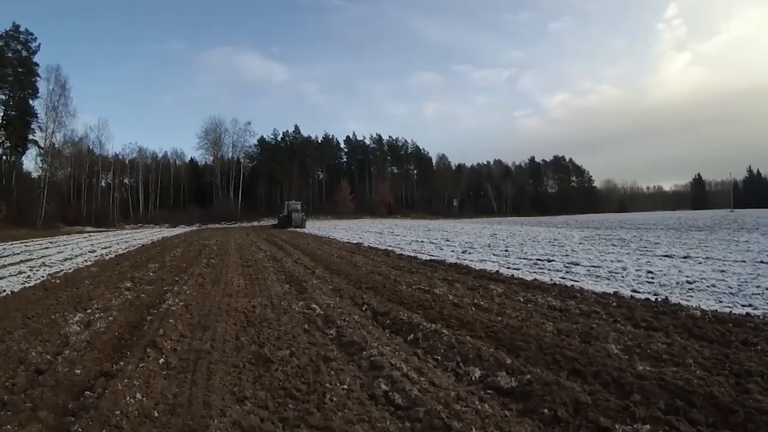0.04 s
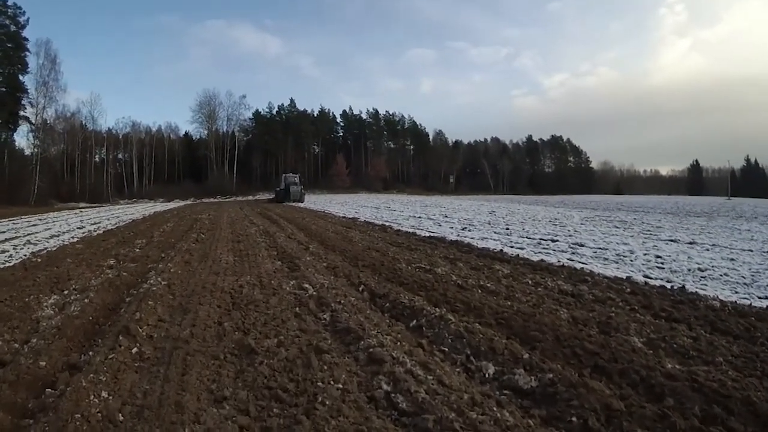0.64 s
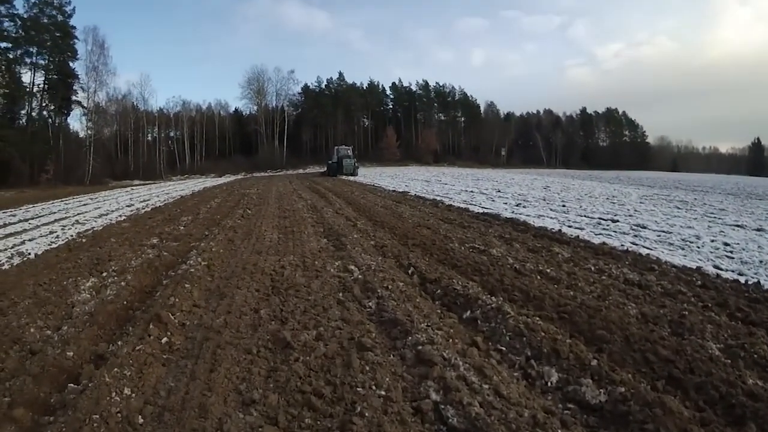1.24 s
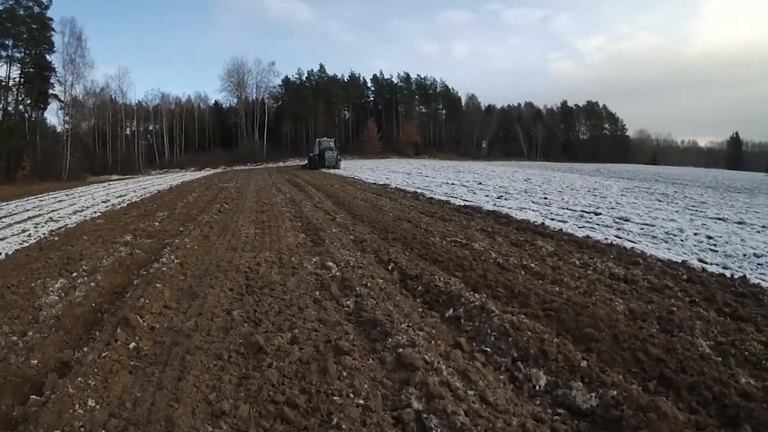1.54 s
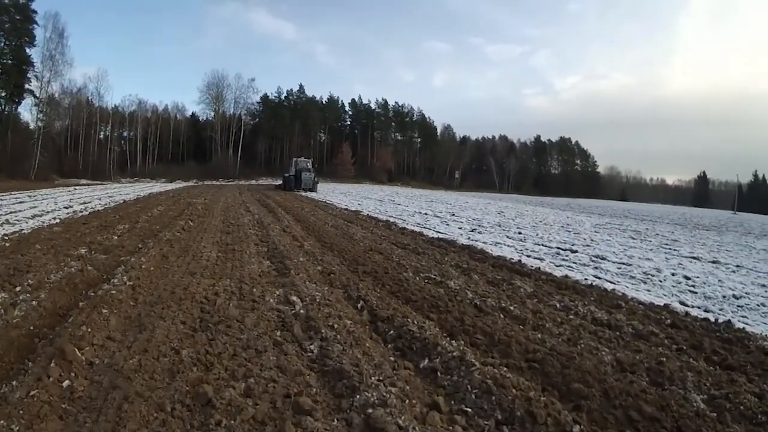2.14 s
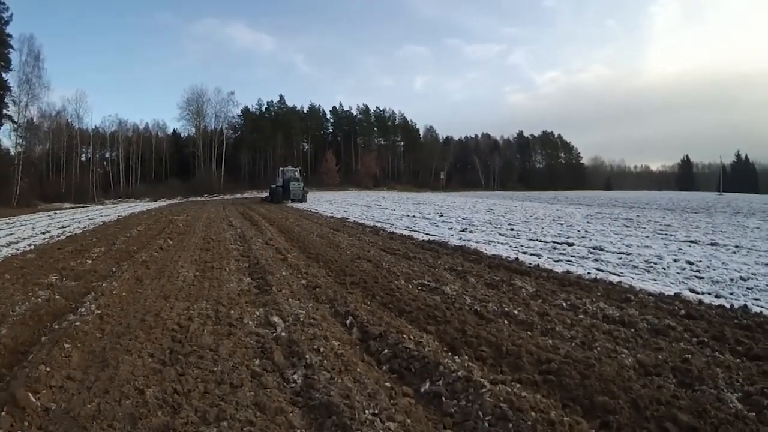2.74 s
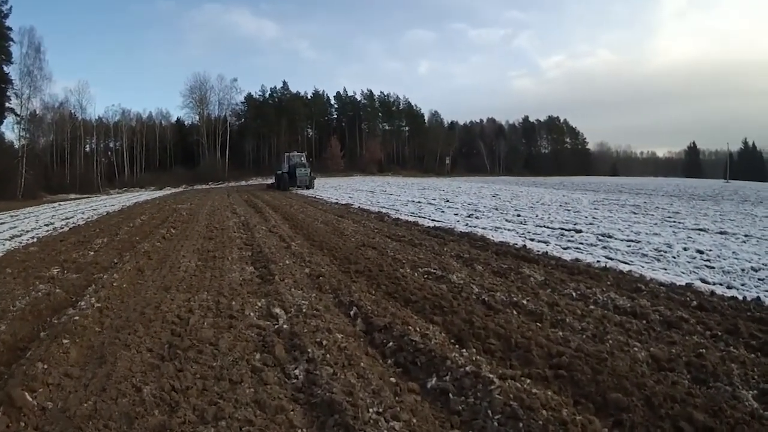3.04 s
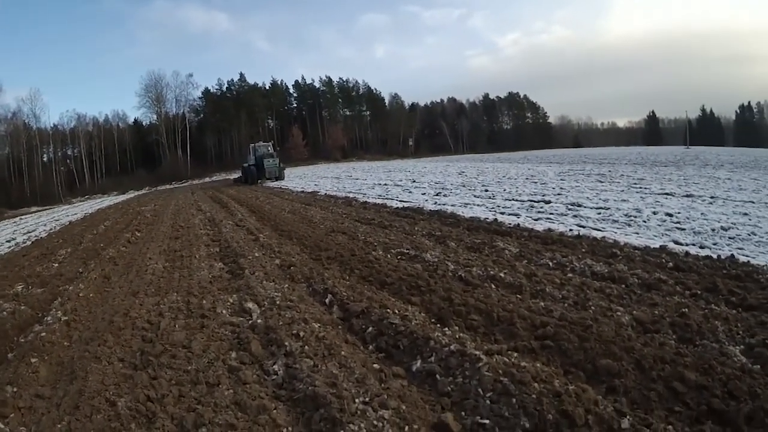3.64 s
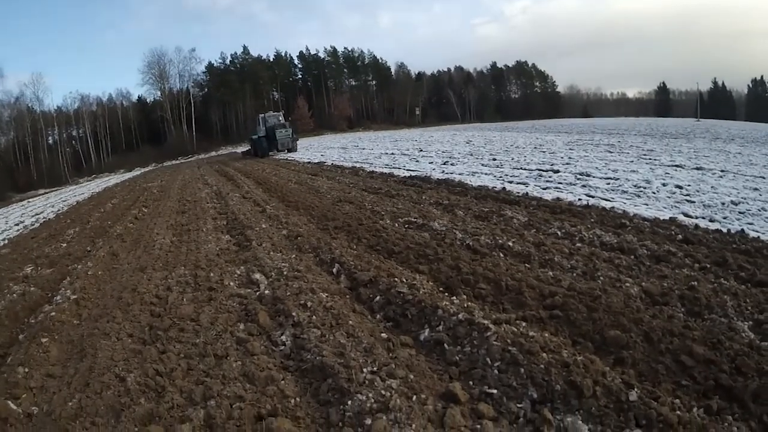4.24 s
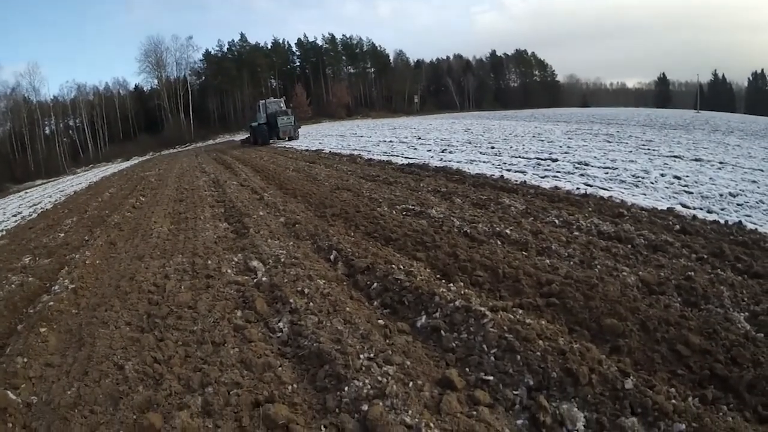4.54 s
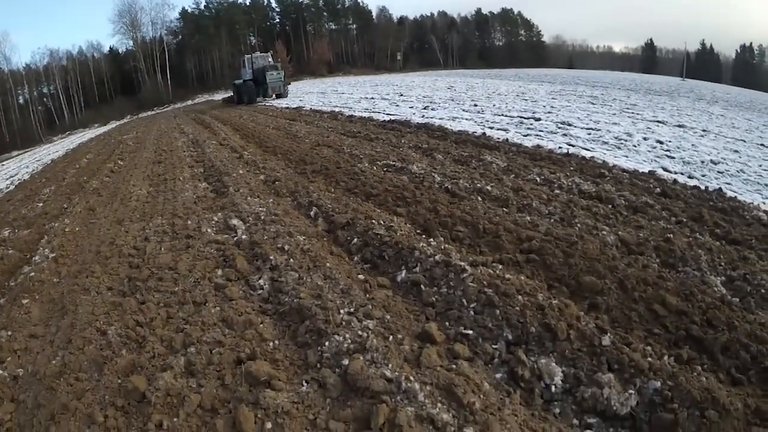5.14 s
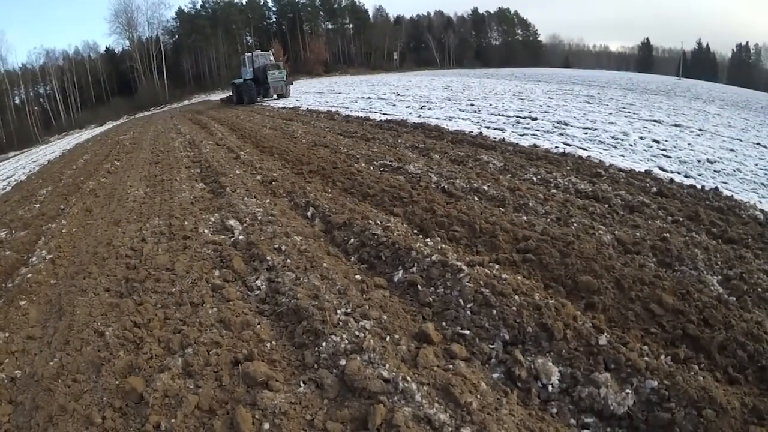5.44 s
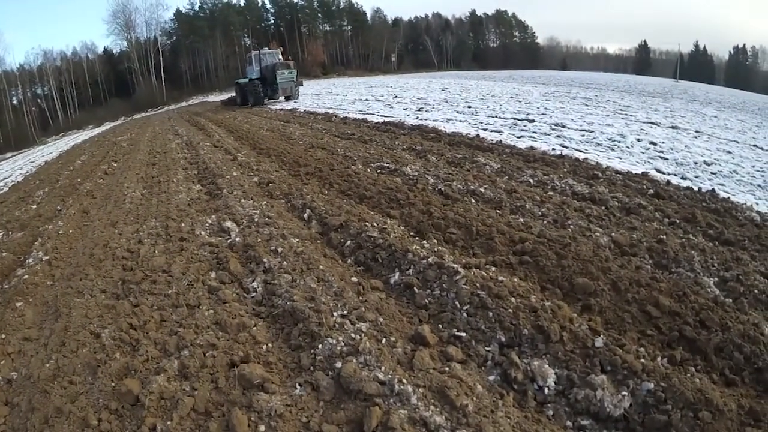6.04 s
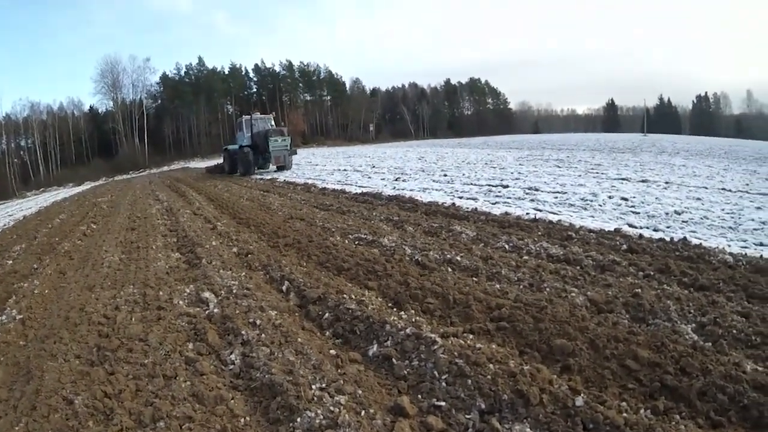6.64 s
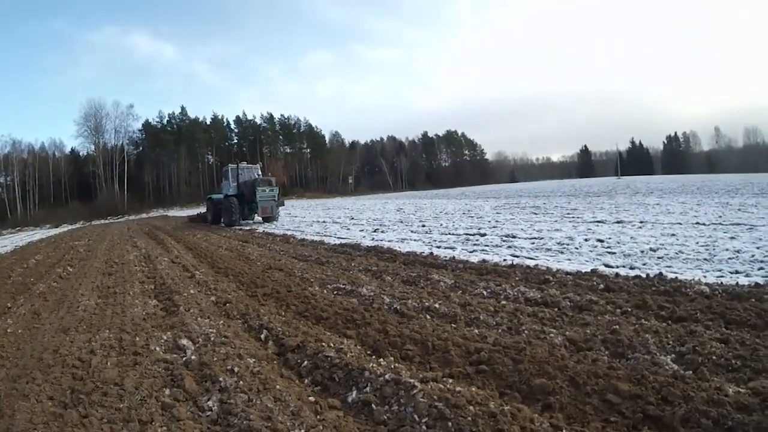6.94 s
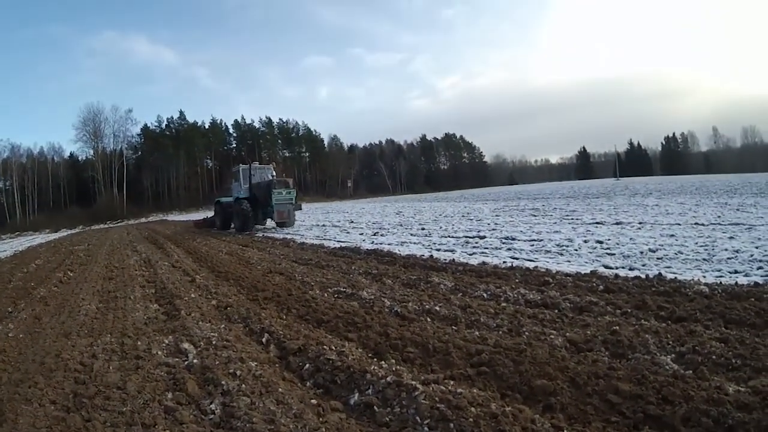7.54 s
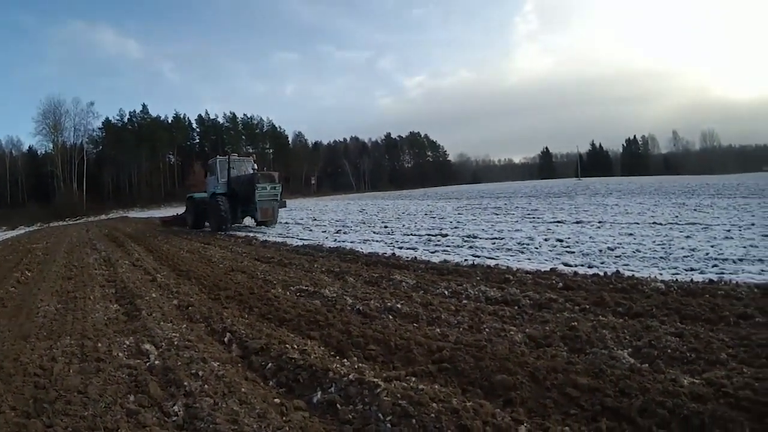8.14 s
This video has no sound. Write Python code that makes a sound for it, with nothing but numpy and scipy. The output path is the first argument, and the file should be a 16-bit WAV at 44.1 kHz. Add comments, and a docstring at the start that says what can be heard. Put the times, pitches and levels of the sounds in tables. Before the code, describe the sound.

A diesel tractor drones steadily closer across a field, its engine knocking, whining and rattling, with one short air hiss near the end.

```python
"""A low diesel boom comes slowly closer: a six-cylinder tractor drags an implement over a half-frozen field.
Unevenly spaced firings pulse from the exhaust, combustion knocks in the block, gears whine, valve gear
ticks and gas hisses. Short reflections interfere with the engine sound and sweep its colour.
Rubbing steel squeals faintly, wind brushes the microphone, and near the end an air valve spits once."""
import sys
import numpy as np
from scipy import signal
from scipy.fft import rfft, irfft, next_fast_len
from scipy.io import wavfile
from scipy.ndimage import uniform_filter1d, map_coordinates

SR = 44100
rng = np.random.default_rng(int(sys.argv[2]) if len(sys.argv) > 2 else 0)


def generate_wav(sig):
    """Save sig (samples, or channels by samples) to the path in sys.argv[1] as 16-bit PCM at SR."""
    pcm = np.round(np.clip(np.atleast_2d(sig).T, -1, 1) * 32767).astype(np.int16)
    wavfile.write(sys.argv[1], SR, pcm)


N = 369999
TIME = np.arange(N) / SR

# engine speed, hunting under the governor: time_s, firing_hz
FIRING_RATE = [(0.0, 79.67), (1.05, 79.17), (1.35, 79.9), (1.8, 78.9), (2.1, 79.69), (2.7, 79.03),
               (3.15, 80.17), (3.45, 79.29), (3.75, 81.13), (3.9, 79.27), (5.55, 79.44), (5.85, 79.92),
               (6.0, 79.27), (6.6, 79.86), (6.75, 79.8), (8.4, 79.27)]
# cylinder strengths in firing order: level_db
CYLINDER_DB = [-1.5, 4, -2, -1.4, -2.3, 0.8]
# exhaust harmonics of the engine cycle (6 is the firing tone): harmonic, level_db
EXHAUST_LINES = [(3, -22), (4, -24), (5, -26.5), (6, 0.5), (7, -29), (8, -26), (9, -14.5), (12, -25),
                 (15, -21), (18, -25.5)]
# gear and fan tones, relative to the knock: harmonic (rounded in use), nose_db, flank_db
WHINE_LINES = [(32, -32, -19.5), (60, -10.5, -8), (63.3, -38, -8.5), (66, -22, -1), (69.6, -13, -11),
               (78.5, -24, -8.5), (94.4, -18, -20), (117, -21, -27), (126, -32, -20)]
# spectral envelopes of the noises: frequency_hz, level_db
GROWL_SPECTRUM = [(90, 2), (150, -1), (235, 0.5), (290, -3), (360, 1), (440, 2.5), (560, -3), (900, -49)]
KNOCK_SPECTRUM = [(200, -21), (290, -8.5), (370, -4), (480, -4.5), (640, -3), (800, 0), (980, 1),
                  (1200, -11), (1500, -8), (2500, -41), (5000, -47)]
RATTLE_SPECTRUM = [(700, -54), (1200, 4.5), (1550, -0.5), (1800, 1), (2100, 0), (2500, -5), (3000, -6),
                   (3500, -6.5), (4400, -18.5), (5500, -15), (9000, -29.5)]
HISS_SPECTRUM = [(1500, 1.5), (3000, -5.5), (4600, 1.5), (6000, -0.5), (7500, 0.5), (9200, 1), (10500, -2),
                 (12000, -6), (13500, -9), (15300, -28)]
WIND_SPECTRUM = [(8, 11), (18, 24), (35, 4.5), (60, -8), (100, -3), (200, -21.5), (500, -73)]
VALVE_SPECTRUM = [(1200, -10), (2400, -8), (3500, -4.5), (5800, -5.5), (9000, -1.5), (11500, -2.5),
                  (13500, -5.5), (15300, -9)]
# resonances of small steel parts: pitch_hz, width_hz, level_db
STEEL_MODES = [(932, 93, 5), (1561, 25, 3.5), (2020, 31, -2), (2370, 40, -15), (2604, 105, -4.5),
               (2925, 22, 2), (3146, 11, 1), (3800, 60, -10), (4270, 210, -7), (4690, 26, -3)]
# slow swells on top of the approach: time_s, boom_db, treble_db
SWELLS = [(0.2, 0, -2.5), (0.9, -0.5, -0.7), (1.6, -0.8, -1.5), (2.8, 0.4, 1.65), (4.0, -0.3, 0.2),
          (4.8, 1.4, 1), (5.6, 0.3, 1.5), (6.8, 0.5, 0.8), (8.3, 0.3, 0.1)]
# side of the engine facing the listener: time_s, flank_share (0 nose, 1 flank)
ASPECT = [(0, 0.41), (2.9, 0.099), (5.1, 0.27), (5.8, .6), (6.55, 0.63), (7.1, 0.98), (8.39, 0.66)]
# squeals of rubbing steel: start_s, length_s, pitch_hz, level_db
SQUEAL_EVENTS = [(-.1, .9, 2400, -54.5), (-.1, .7, 2950, -50), (-.1, 1.8, 4770, -52),
                 (2.7, 0.52, 2930, -48), (4.25, 0.71, 2926, -51), (4.35, .4, 4700, -47),
                 (5.0, 0.59, 2640, -51.5)]
# echo off a nearby surface, later as the microphone tips down: time_s, delay_ms, gain
NEAR_REFLECTION = [(0.6, 1.697, .2), (1.4, 1.83, 0.28), (2.45, 1.88, 0.28), (3.35, 1.46, 0.21),
                   (4.3, 1.665, .24), (5.1, 1.8, 0.29), (6.45, 1.89, 0.24), (6.95, 1.33, .2),
                   (8.39, 1.39, .34)]
# wind on the microphone: time_s, level_db
WIND_LEVEL = [(0, -39), (2, -41), (5, -31), (8.39, -37)]

START_M, DRIVE_M_S = 49.6, 3.574  # a straight, steady approach
# layers that grow as the distance halves: start_db, per_halving_db
BOOM_DB, GROWL_DB = (-22, 7), (-46.5, 14.5)
KNOCK_DB, RATTLE_DB, HISS_DB = (-34, 7.5), (-39.5, 7), (-47.5, 11)
# directional parts, relative to the knock: nose_db, flank_db
PANEL_DB, BONNET_DB, HARD_CYLINDER_DB, HUM_DB = (-24, -3.5), (-4.5, -11.5), (-6.5, -15), (-21.5, -8)


def undb(db):
    """Amplitude ratio from decibels."""
    return 10 ** (np.asarray(db) / 20)


def unit(x):
    """Normalisation to rms 1."""
    return x / np.sqrt(np.mean(x ** 2))


def curves(table):
    """Linear interpolation of each column through time."""
    time_s, *columns = np.transpose(table)
    return [np.interp(TIME, time_s, column) for column in columns]


def noise():
    """Gaussian white noise."""
    return rng.standard_normal(N)


def walk(rate_hz):
    """Smooth random modulation with a spread near 1."""
    coarse = TIME[::100]
    steps = rng.standard_normal(2048)
    return np.interp(TIME, coarse, map_coordinates(steps, [coarse * rate_hz], order=2, mode="wrap"))


def shape(x, response):
    """Filtering as multiplication of the spectrum; the result has rms 1."""
    size = next_fast_len(N + 8192)
    hz = np.arange(size // 2 + 1) * SR / size + 1e-3
    return unit(irfft(rfft(x, size) * response(hz), size)[:N])


def colour(x, spectrum):
    """Filtering by a spectral envelope, interpolated in log frequency."""
    hz, db = np.transpose(spectrum)
    return shape(x, lambda f: undb(np.interp(np.log(f), np.log(hz), db)))


def mode(f, hz, width_hz):
    """Frequency response of a damped oscillator."""
    return 1 / (1 + 1j * (f * f - hz * hz) / (f * width_hz))


def resonate(x, hz, width_hz):
    """Two equal resonators in cascade give a peak with steep skirts."""
    return shape(x, lambda f: mode(f, hz, width_hz) ** 2)


def facing(nose_db, flank_db):
    """Directivity: a part's level in dB depends on the side turned to the listener."""
    flank_share, = curves(ASPECT)
    return nose_db + (flank_db - nose_db) * flank_share


def cycle_noise(cycle, repeat, size=3328):
    """Partly periodic noise: the share `repeat` of its power recurs every engine cycle."""
    pattern = signal.resample(rng.standard_normal(size), 4 * size)
    periodic = np.interp(cycle % 1, np.linspace(0, 1, len(pattern)), pattern)
    return np.sqrt(repeat) * periodic + np.sqrt(1 - repeat) * noise()


def firings(cycle, decay, base, lag=0.13):
    """Exponential decay to a base after each firing; decay and lag are in firing intervals."""
    count = len(CYLINDER_DB) * cycle
    count = count - lag * np.cos(np.pi * count / 2) ** 2 + 1  # every second cylinder fires late
    index = count.astype(int)
    scatter_db = 2.6 * np.clip(rng.standard_normal(1024), -1.8, 1.8)[index % 1024]
    strength = undb(np.take(CYLINDER_DB, index, mode="wrap") + scatter_db)
    return base + strength * np.exp(-(count % 1) / decay)


def exhaust_boom(cycle, boom_db, growl_db):
    """Periodic pulses form a harmonic series; uneven spacing adds half orders, unequal cylinders a lope."""
    lines = 0
    for harmonic, db in EXHAUST_LINES:
        # the firing tone is the steadiest; the upper lines grow with the growl
        waver_db = .25 if harmonic == len(CYLINDER_DB) else 1.2
        level_db = boom_db if harmonic < 2 * len(CYLINDER_DB) else (boom_db + growl_db) / 2 + 7
        phase = 2 * np.pi * harmonic * cycle + 0.0811 * harmonic ** 2  # dispersion in the silencer
        lines += undb(db + level_db + waver_db * walk(14)) * np.cos(phase)
    flutter = colour(noise(), [(15, -15), (40, 0), (66, 3), (100, -15), (135, -6), (170, -18), (300, -48)])
    return np.sqrt(2) * lines + undb(boom_db - 20) * flutter


def exhaust_growl(cycle):
    """Low flow noise in the stack, amplitude-modulated by the firings."""
    flow = cycle_noise(cycle, repeat=.35) * firings(cycle, decay=0.39, base=2.5)
    return colour(flow, GROWL_SPECTRUM)


def block_knock(cycle):
    """Forced vibration: combustion drives the block, the side panel and the bonnet."""
    force = firings(cycle, decay=0.43, base=4.2)
    casting = colour(force * cycle_noise(cycle, repeat=0.41), KNOCK_SPECTRUM)
    panel = resonate(force * cycle_noise(cycle, repeat=0.54), hz=888, width_hz=310)
    bonnet = resonate(force * cycle_noise(cycle, repeat=0.16), hz=1016, width_hz=435)
    knock = casting + undb(facing(*PANEL_DB)) * panel + undb(facing(*BONNET_DB)) * bonnet
    return knock * undb(0.99 * walk(9))


def hard_cylinder(cycle):
    """Impulse excitation: once a cycle, one harder-knocking cylinder rings the crankcase."""
    age_cycles = (cycle - 0.418) % 1
    envelope = np.exp(-age_cycles / 0.27) * (1 - np.exp(-age_cycles / 0.025))
    blows = envelope * cycle_noise(cycle, repeat=0.22)
    return undb(facing(*HARD_CYLINDER_DB)) * resonate(blows, hz=655, width_hz=170)


def gear_whine(cycle):
    """Gears and fan radiate directional harmonics of the engine cycle, which fade in and out in the air."""
    tones = 0
    for harmonic, nose_db, flank_db in WHINE_LINES:
        drift = .5 * walk(6) + rng.uniform(0, 2 * np.pi)
        level_db = facing(nose_db, flank_db) + 2.2 * walk(4)
        tones += undb(level_db) * np.sin(2 * np.pi * np.round(harmonic) * cycle + drift)
    return tones


def transmission_hum(cycle, harmonic=39, beat_hz=2.55):
    """Beating: two loaded gears hum at nearly the same frequency."""
    mesh_phase = 2 * np.pi * harmonic * cycle + 0.42 * walk(8)
    beat_phase = 2 * np.pi * beat_hz * (TIME - .28)
    return undb(facing(*HUM_DB)) * unit(np.sin(mesh_phase) + np.sin(mesh_phase + beat_phase))


def rattle(cycle):
    """Modal ringing: ticks of injectors and valve gear excite small steel parts."""
    ticks = cycle_noise(cycle, repeat=0.14) * firings(cycle, decay=0.71, base=2.3)
    clatter = colour(ticks, RATTLE_SPECTRUM) * undb(-.5 + .5 * walk(10))
    ringing = shape(ticks, lambda f: sum(undb(db) * mode(f, hz, width) for hz, width, db in STEEL_MODES))
    return clatter + undb(-6 + 1.2 * walk(4)) * ringing


def gas_hiss(cycle):
    """Each firing puffs out hiss; air absorption dulls it while the tractor is far."""
    puffs = uniform_filter1d(firings(cycle, decay=0.34, base=1.27), size=80)
    hiss = colour(noise() * puffs, HISS_SPECTRUM)
    dullness = np.interp(TIME, [0, 3.5, 6, 8.39], [0.44, 0.69, 0.15, 0.0027])
    hiss += dullness * (uniform_filter1d(hiss, size=3) - hiss)
    return hiss * undb(4 * dullness + 0.6 * walk(10))


def steel_squeals(fade_s=.15):
    """Friction excites a narrow resonance in steel, which swells and dies away."""
    squeals = 0
    for start_s, length_s, pitch_hz, level_db in SQUEAL_EVENTS:
        grip = np.clip(np.minimum(TIME - start_s, start_s + length_s - TIME) / fade_s, 0, 1)
        squeals += grip * undb(level_db + 2 * walk(12)) * resonate(noise(), pitch_hz, width_hz=150)
    return squeals


def delayed(x, delay_ms):
    """Propagation delay that varies with time."""
    return map_coordinates(x, [(TIME - delay_ms / 1000) * SR], order=3)


def reflections(x, nearness):
    """Comb filtering: the direct sound interferes with echoes of changing delay."""
    near_ms, near_gain = curves(NEAR_REFLECTION)
    dull = signal.lfilter(*signal.butter(1, 5000, fs=SR), x)  # the surfaces return less treble
    # the ground inverts the wave, and its path lags more as the tractor nears
    ground = -.12 * delayed(x, delay_ms=0.603 * nearness)
    near_surface = near_gain * delayed(dull, near_ms)
    further_surface = 0.093 * delayed(dull, near_ms + 0.797)
    return x + ground + near_surface + further_surface


def wind():
    """Pressure fluctuations of gusts on the microphone make a low rumble."""
    breeze_db, = curves(WIND_LEVEL)
    gust_db = 2.3 * walk(4)
    return colour(noise(), WIND_SPECTRUM) * undb(breeze_db + gust_db)


def air_valve(start_s=8.058, level_db=-14.5, attack_s=.03, shut_after_s=.038, fall_db_per_s=320):
    """Jet noise: compressed air escapes as a valve briefly opens."""
    age_s = TIME - start_s
    opening = np.sqrt(np.clip(age_s / attack_s, 0, 1))
    fall_db = fall_db_per_s * np.maximum(age_s - shut_after_s, 0)
    return colour(noise(), VALVE_SPECTRUM) * opening * undb(level_db - fall_db)


def scene():
    """Superposition of the sources; the engine layers grow louder as the distance shrinks."""
    firing_hz, = curves(FIRING_RATE)
    boom_swell_db, treble_swell_db = curves(SWELLS)
    cycle = np.cumsum(firing_hz) / SR / len(CYLINDER_DB)  # engine cycles done, two crank turns each
    nearness = START_M / (START_M - DRIVE_M_S * TIME)
    boom_db, growl_db, knock_db, rattle_db, hiss_db = (
        start_db + per_halving_db * np.log2(nearness)
        for start_db, per_halving_db in (BOOM_DB, GROWL_DB, KNOCK_DB, RATTLE_DB, HISS_DB))
    tones = gear_whine(cycle) + transmission_hum(cycle)
    knocks = block_knock(cycle) + hard_cylinder(cycle)
    treble = undb(rattle_db) * rattle(cycle) + undb(hiss_db) * gas_hiss(cycle)
    engine = undb(knock_db) * (knocks + tones) + undb(treble_swell_db) * treble + steel_squeals()
    boom = exhaust_boom(cycle, boom_db + boom_swell_db, growl_db)
    growl = undb(growl_db) * exhaust_growl(cycle)
    mono = boom + growl + reflections(engine, nearness) + air_valve() + wind()
    return np.array([mono, mono])


def record(dry, cutoff_hz=15200):
    """Band limiting: a steep low-pass removes the highest treble."""
    return signal.sosfilt(signal.ellip(10, .2, 80, cutoff_hz, fs=SR, output="sos"), dry)


dry = scene()
out = record(dry)
generate_wav(out)
```